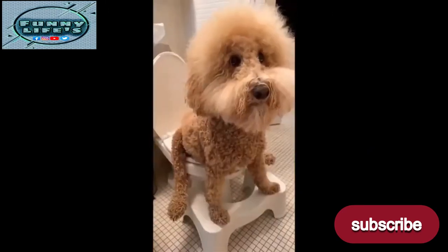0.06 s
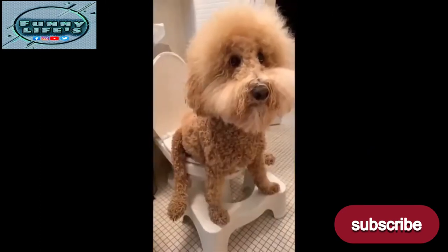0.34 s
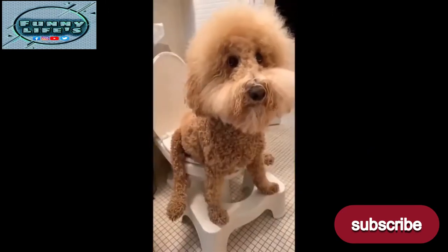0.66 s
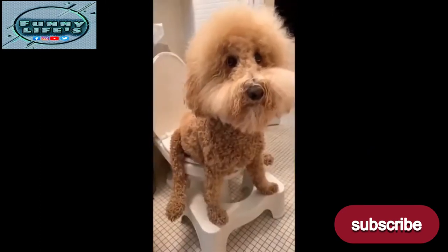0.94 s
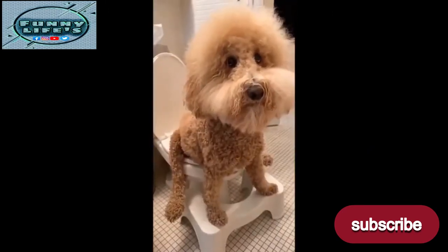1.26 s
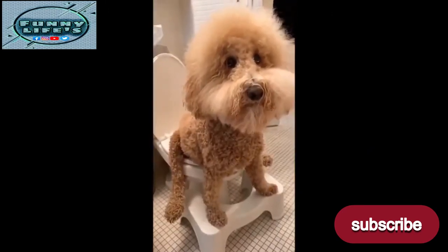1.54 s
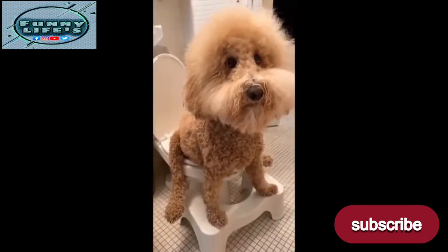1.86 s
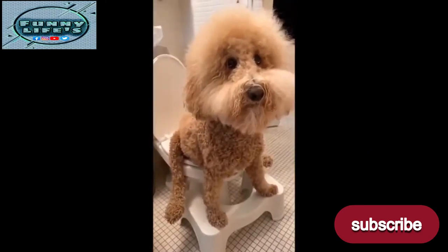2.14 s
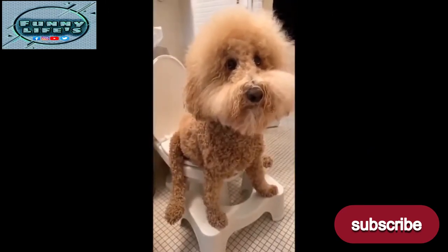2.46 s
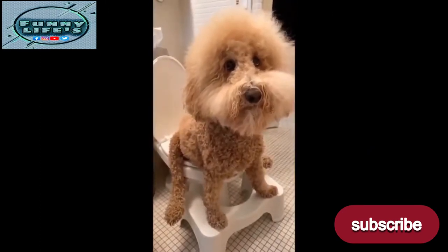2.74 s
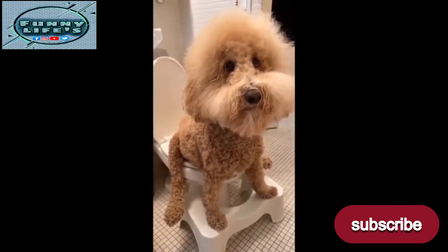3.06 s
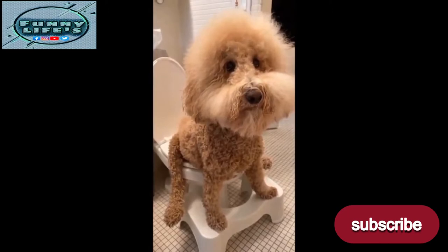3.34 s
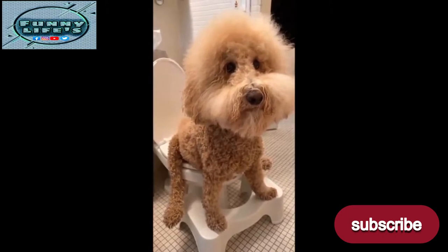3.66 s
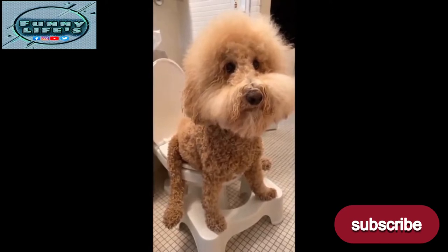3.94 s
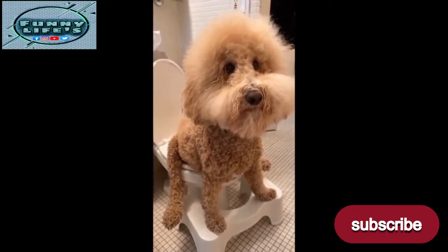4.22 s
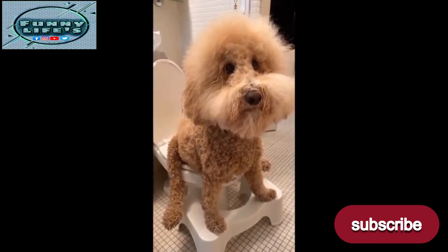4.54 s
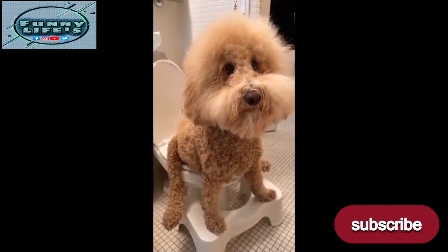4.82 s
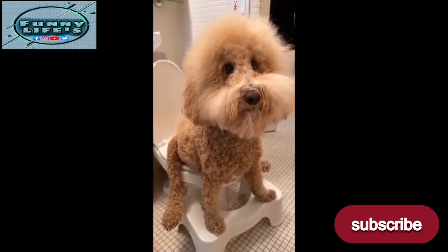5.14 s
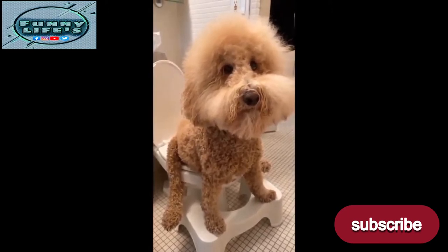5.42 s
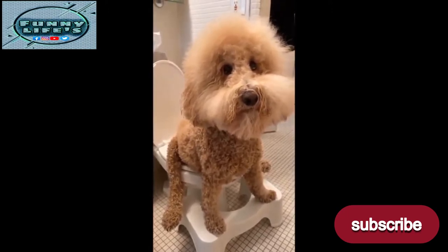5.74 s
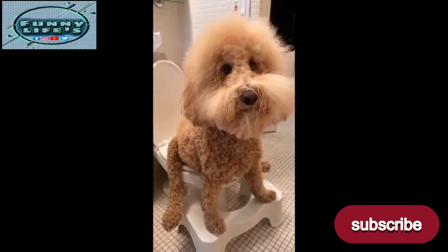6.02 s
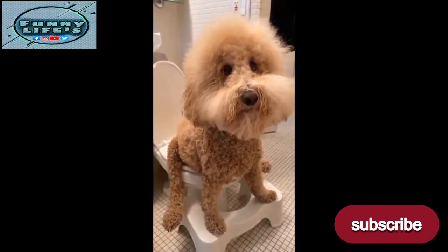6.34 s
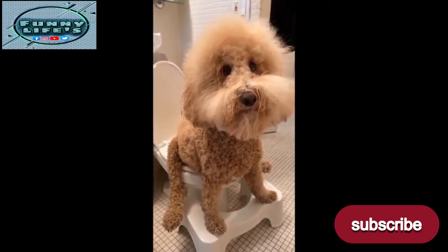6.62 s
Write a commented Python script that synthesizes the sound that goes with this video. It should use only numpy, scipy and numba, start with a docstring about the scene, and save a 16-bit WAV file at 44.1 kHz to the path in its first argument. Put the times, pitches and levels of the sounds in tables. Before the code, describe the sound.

In a small tiled bathroom, a ventilation fan hums quietly while a thin stream of liquid pours into a toilet nearby. It spatters and bubbles for around four seconds, with hollow glugs from the bowl, then breaks into drops. After a pause of about a second, it comes back in a brief splashing spurt, ending in soft fizzing and a few faint drips.

```python
"""A thin stream into a toilet bowl

The stream falls into the water for four seconds, dribbles out and returns in one short spurt. It splashes
and traps bubbles, each an oscillator whose pitch is lower the larger it is; the big ones gurgle in the
resonances of the bowl and a small tiled room. Foam fizzes after each pour, a few drips fall, and a
ventilation fan hums throughout."""
import sys
import numpy as np
from scipy import signal
from scipy.fft import rfft, irfft, next_fast_len
from scipy.io import wavfile
from scipy.ndimage import uniform_filter1d
from numba import njit

SR = 44100
rng = np.random.default_rng(int(sys.argv[2]) if len(sys.argv) > 2 else 0)


def wav_out(sig):
    """Save sig, one row per channel (or a flat mono array), as 16-bit PCM at SR to the path in sys.argv[1]."""
    wavfile.write(sys.argv[1], SR, np.round(np.clip(np.atleast_2d(sig).T, -1, 1) * 32767).astype(np.int16))


N = 299439
TIME = np.arange(N) / SR

# The two pours. Each row: times of first drops, full stream and break-up in seconds, spray level and
# opening surge in dB, sag and final fade in dB per second, starting cavity pitch in Hz, time before the
# froth thins and longest dribble in seconds.
POURS = [(0.177, 0.28, 4.195, -39.5, 6, 0.5, 133, 346.4, 0.43, 0.42),
         (5.297, 5.349, 6.02, -37, 2, 10, 268, 306.5, 0.36, 0.1)]
# Deep plunges that each trap one large bubble. Each row: start in seconds, relative peak level in dB,
# pitch in Hz, swell of the gurgle in dB.
PLUNGES = [(0.352, -18.5, 353, 4), (0.648, -17, 417, -0.5), (0.974, -22, 349, 3), (1.069, -20.5, 423, 4),
           (1.297, -22, 420, 3.5), (1.38, -24, 406, 3.5), (1.64, -28, 371, 5.5), (2.124, -19.5, 395, 4),
           (3.844, -22.5, 426, -0.5), (3.922, -21.5, 380, -1.5), (5.345, -17, 295.2, -0.5),
           (5.496, -22, 291, -0.5), (5.616, -14, 349, 4), (5.887, -19.5, 433, 4.5)]
# Drops that each trap one ringing bubble. Each row: start in seconds, relative peak in dB, pitch in Hz.
PLINKS = [(0.2139, -34.5, 3780), (0.2197, -41, 2640), (0.2303, -21.5, 7530), (0.33, -21.5, 6700),
          (0.358, -21.5, 3760), (0.41, -22, 3640), (0.5807, -25, 3630), (0.7933, -24, 3640),
          (0.9608, -25, 7290), (1.1067, -15, 7980), (1.29, -25.5, 8200), (1.555, -19, 7620),
          (1.758, -22, 7740), (1.841, -29, 4140), (2.2062, -23.5, 6600), (2.384, -24.5, 10700),
          (2.9395, -19, 9100), (3.082, -34, 803), (3.2784, -21.5, 8100), (3.4063, -24.5, 4080),
          (3.454, -31.5, 1590), (3.8735, -19, 9050), (4.3196, -46, 1110), (4.3625, -48.5, 1120),
          (4.495, -43, 594), (5.314, -25.5, 5470), (5.326, -27, 8800), (5.3935, -26, 4000),
          (5.4547, -27.5, 3120), (5.912, -34.5, 3730), (6.075, -29.5, 729), (6.233, -38, 7000)]
# Water landing with a smack. Each row: start in seconds, peak in dB, centre in Hz, width in octaves.
SMACKS = [(0.269, -27.5, 824, 0.52), (0.464, -27, 720, 0.2), (0.84, -20.5, 5670, 1.3),
          (0.974, -16.5, 6000, 1.3), (1.341, -26.5, 8600, 0.64), (1.677, -20, 7250, 1.2),
          (2.116, -33, 1000, 0.38), (2.331, -23.5, 817, 0.23), (2.510, -25, 5740, 1.4),
          (2.636, -23, 6000, 2.1), (3.244, -23.5, 9200, 0.7), (3.455, -19.5, 8500, 0.69),
          (3.984, -20.5, 8600, 3.6), (4.828, -45, 1230, 0.43), (4.839, -43.5, 1200, 0.7),
          (4.865, -50, 1480, 1.2), (4.887, -42, 10500, 0.22), (5.087, -42.5, 4200, 3),
          (5.281, -37, 7900, 3.8), (5.336, -25.5, 1500, 3.1), (5.345, -15, 5660, 1.38),
          (5.347, -24, 2040, 0.57), (5.512, -29, 6840, 0.57), (5.695, -13.5, 6150, 0.65),
          (6.464, -50, 7950, 1.4), (6.596, -48, 7000, 1), (6.727, -52, 8900, 0.38)]

OPENING_S, PLUNGE_S = 0.12, 0.033  # decay time of a pour's opening surge; swell time of a plunge


def gurgle(room, rate, spread_db, scatter, cycles, stray_db):
    """Minnaert resonance: large bubbles ring low, half near the cavity pitch, half weaker and astray."""
    start, place, deviate, size = random_grains(rate, spread_db)
    stray = np.arange(len(start)) % 2 == 0
    clustered_hz = np.interp(start, TIME, cavity_pitch()) * np.exp(scatter * deviate)
    hz = np.where(stray, 260 + 300 * place, clustered_hz)
    size = size * np.where(stray, undb(stray_db), 1)
    grains = bubbles(N, start, hz, np.full(len(hz), float(cycles)), size, glide=0.38)
    plunging_db = sum(db * swell(s - PLUNGE_S / 2, PLUNGE_S) for s, _, _, db in PLUNGES)
    return cloud(grains, stirring(column=1, surge_db=1) * undb(plunging_db - 1), room)


def cavity_pitch(shallow_hz=445.6, climb_s=0.82, dip=0.067):
    """Pitch follows depth: it climbs as the cavity dug by the stream gets shallower; plunges lower it."""
    hz = np.full(N, shallow_hz)
    for first, full, *_, deep_hz, _, _ in POURS:
        climbing_hz = shallow_hz + (deep_hz - shallow_hz) * np.exp(-since(full) / climb_s)
        hz = np.where(TIME >= first, climbing_hz, hz)
    plunging = np.max([swell(s, PLUNGE_S) for s, *_ in PLUNGES], axis=0)
    return hz * (1 - dip * plunging)


def stirring(column, surge_db, dig_s=0.031, settle_db_per_s=70):
    """Excitation and decay: a gain that surges as the stream digs its cavity and settles at break-up."""
    # Bubble activity round the cavity, one list per pour. Each row: time in seconds, then relative
    # levels of gurgle, churn and babble in dB.
    cavity = [
        [(0.5, -33.5, -47.5, -48), (0.75, -36, -47, -50.5), (1.16, -41.5, -51, -48), (1.84, -43, -47.5, -53.5),
         (2.27, -47, -46, -49), (2.73, -47.5, -48, -54.5), (3.01, -48.5, -43, -48.5), (3.95, -37.5, -53, -48),
         (4.09, -40.5, -46.5, -50), (4.2, -40.5, -48.5, -50)],
        [(5.5, -35, -53.5, -50.5), (5.828, -40, -49, -49), (6.05, -46.5, -51, -55)],
    ]
    gain = 0
    for (_, full, stop, *_), rows in zip(POURS, cavity):
        rows = np.array(rows)
        db = np.interp(TIME, rows[:, 0], rows[:, column]) + surge_db * np.exp(-since(full) / OPENING_S)
        gain += rise(full - dig_s, dig_s) * undb(db - settle_db_per_s * since(stop))
    return gain


def spray(room, ping_db, spatter_db=-17, spatter_s=0.0052):
    """Impact excitation: each bead throws a burst of crackle, small bubbles ping, sharp drops spatter."""
    # Spectrum of the spray. Each row: frequency in Hz, relative gain in dB.
    spray_colour = [(1180, -18.5), (2000, 7.5), (2210, -4.5), (2530, -8.5), (3490, 1), (4310, -0.5),
                    (5990, 1), (6580, -1.5), (7940, 1.5), (8650, -2), (9880, -1), (13000, -11)]
    patter = crackle(rate=12000, spread_db=7.5, cycles=7.8)
    patter *= beads(rate=125, spread_db=2.0, decay_s=0.0022, steady=0.089)
    pings = crackle(rate=800, spread_db=5.5, cycles=21.0)
    grains = level(patter, 0) + level(pings, ping_db)
    spatter = sum(undb(db + spatter_db) * swell(s, spatter_s)
                  for s, db, hz, *_ in PLINKS + SMACKS if hz > 3000)
    return cloud(colour(grains, spray_colour), np.hypot(flow(), spatter), room)


def flow():
    """Amplitude envelope of the stream: each pour opens with a surge, sags and fades at break-up."""
    gain = 0
    for first, full, stop, db, surge_db, sag, fade, *_ in POURS:
        opening_db = surge_db * np.exp(-since(full) / OPENING_S)
        gain += rise(first, full - first) * undb(db + opening_db - sag * since(full) - fade * since(stop))
    return gain


def crackle(rate, spread_db, cycles):
    """Resonance at small scale: tiny bubbles and droplets ring briefly, spread evenly over the treble."""
    start, place, deviate, size = random_grains(rate, spread_db)
    hz = 2200 + 11300 * place
    ring_cycles = cycles * np.exp(deviate / 2) + 1
    return bubbles(N, start, hz, ring_cycles, size * np.sqrt(hz / ring_cycles), glide=0.05)


def beads(rate, spread_db, decay_s, steady):
    """Shot noise as an envelope: abrupt random bursts decay and add in power over a steady floor."""
    start, _, _, size = random_grains(rate, spread_db)
    hits = np.bincount((start * SR).astype(int), (size / size.mean()) ** 2, N)[:N]
    power = signal.lfilter([1], [1, -np.exp(-2 / (decay_s * SR))], hits)
    return np.sqrt(steady ** 2 + power)


def drops(room, glug_db, glug_cycles, plink_db, plink_cycles, smack_s=0.0013):
    """Transients: trapped bubbles ring freely as glugs and plinks; impacts smack as bursts of noise."""
    out, t = np.zeros(N), TIME[:SR // 20]
    for s, db, hz, _ in PLUNGES:
        add(out, s, db + glug_db, lone_bubble(hz, glug_cycles, glide=0.091), room)
    for s, db, hz in PLINKS:
        add(out, s, db + plink_db, lone_bubble(hz, plink_cycles, glide=0.031), room)
    for s, db, hz, octaves in SMACKS:
        edges_hz = np.clip(hz * 2 ** (np.array([-1, 1]) * octaves / 2), 100, 0.45 * SR)
        band = signal.butter(2, edges_hz, "band", fs=SR, output="sos")
        noise = signal.sosfilt(band, rng.standard_normal(len(t)))
        add(out, s, db, noise * t * np.exp(-t / smack_s), room)
    return out


def churn(room, rate, spread_db, cycles):
    """Volume pulsation: middle-sized bubbles ring as they tumble in the water around the cavity."""
    start, place, deviate, size = random_grains(rate, spread_db)
    hz = 760 * np.exp(0.15 * deviate)
    grains = bubbles(N, start, hz, cycles * (0.5 + place), size, glide=0.28)
    return cloud(grains, stirring(column=2, surge_db=9) * undb(2), room)


def babble(room, rate, spread_db, cycles):
    """Pitch varies inversely with radius: small bubbles stirred in with the spray ring above the churn."""
    start, place, deviate, size = random_grains(rate, spread_db)
    hz = 1000 + 1550 * place
    grains = bubbles(N, start, hz, cycles * np.exp(0.3 * deviate), size * np.sqrt(hz), glide=0.026)
    return cloud(grains, stirring(column=3, surge_db=5.5) * undb(0.5), room)


def dribble(room, cycles, scatter, spread_db, hz=3670, db=-34, fade_db_per_s=42):
    """Jet break-up: each pour ends in a row of similar drops that ring ever more faintly."""
    lead_s, gap_s = 0.05, 0.031  # head start on the break-up; time between drops
    out = np.zeros(N)
    for _, _, stop, *_, dribble_s in POURS:
        for k, (late, sharp, loud) in enumerate(rng.standard_normal((12, 3))):
            age = (k + late / 8) * gap_s
            if age < dribble_s:
                ring = lone_bubble(hz * np.exp(scatter * sharp), cycles, glide=0.07)
                add(out, stop - lead_s + age, db - fade_db_per_s * age + spread_db * loud, ring, room)
    return out


def foam(room, db=-59.5, rise_s=0.13, fade_db_per_s=57):
    """Film rupture: the froth left by each pour bursts in fine ticks, lasts a moment and thins out."""
    # Spectrum of the fizz. Each row: frequency in Hz, relative gain in dB.
    foam_colour = [(1180, -51), (2000, -26), (3330, -4), (4280, -1.5), (6030, 0), (7170, 4), (13000, 0)]
    grains = crackle(rate=1700, spread_db=5.0, cycles=9.9)
    grains *= beads(rate=57, spread_db=10.0, decay_s=0.006, steady=0.31)
    froth = sum(rise(stop, rise_s) * undb(db - fade_db_per_s * since(stop + froth_s))
                for _, _, stop, *_, froth_s, _ in POURS)
    return cloud(colour(grains, foam_colour), froth, room)


def bathroom(early_db, early_t60_s, tail_db, t60_s, treble_t60_s, tail_hz):
    """Impulse response: direct sound, early reflections in the bowl, a tail off the tiles, and modes."""
    # Normal modes of bowl and room. Each row: frequency in Hz, bandwidth in Hz, gain in dB.
    modes = [(287.4, 4.65, 22.5), (353, 7.7, 14.5), (392.9, 13, 9.5), (436, 3.25, 13), (489.8, 4.6, 15),
             (562.4, 8.3, 12), (720, 4, 20), (777, 88, 8.5), (847, 28, 7.5), (1110, 11, 18),
             (1362, 13, 14.5), (1448.5, 17, 19.5), (1839, 24.6, 11.5), (2930, 5, 16), (3642, 42, -8)]
    t = TIME[:SR * 3 // 4]
    noise = highpass(rng.standard_normal(len(t)), tail_hz)
    treble = highpass(noise, 6000, order=1)
    early = noise * undb(-60 * t / early_t60_s) * (1 - np.exp(-t / 0.008))
    tail = (noise - treble) * undb(-60 * t / t60_s) + treble * undb(-60 * t / treble_t60_s)
    tail *= 1 - np.exp(-t / 0.0048)
    response = undb(early_db) * early / np.linalg.norm(early)
    response += undb(tail_db) * tail / np.linalg.norm(tail)
    for hz, width, db in modes:
        ring = np.exp(-np.pi * width * t) * np.sin(2 * np.pi * hz * t)
        response += undb(db) * 2 * np.pi * width / SR * ring
    response[0] += 1  # direct sound
    return highpass(response, hz=245, order=6)  # the bowl is too small to radiate bass


def fan():
    """Broadband and tonal noise: a ventilation fan gives soft rumble and air, with wavering hum lines."""
    # Spectrum of the moving air. Each row: frequency in Hz, relative gain in dB.
    fan_colour = [(13, -60), (22, -32), (48, -8), (69, -6), (91, -14.5), (125, -11), (264, -28), (301, -26),
                  (671, -31.5), (727, -31.5), (975, -34.5), (1340, -39.5), (2120, -41.5), (2550, -45.5),
                  (13000, -57)]
    # Duct, shaft and mains tones. Each row: frequency in Hz, rms level in dB.
    hum_lines = [(31.5, -68), (58.8, -57), (120, -56.5)]
    out = level(colour(rng.standard_normal(N), fan_colour), db=-52.5)
    for hz, db in hum_lines:
        tone = np.sin(2 * np.pi * hz * TIME + 0.085 * walk(rate=3.55))
        out += level(tone * undb(0.46 * walk(rate=7)), db)
    return out


@njit
def bubbles(length, start, hz, cycles, size, glide):
    """Damped oscillators: each swells as its bubble closes, then dies, rising in pitch near the surface."""
    out = np.zeros(length)
    for k in range(len(start)):
        life, first, phase = cycles[k] * SR / hz[k], int(start[k] * SR), 0.
        for i in range(min(int(life), length - first)):
            age = i / life
            phase += 2 * np.pi * min(hz[k] * (1 + glide * age), 0.45 * SR) / SR
            out[first + i] += size[k] * np.sin(phase) * np.exp(-8 * age) * (1 - np.exp(-9 * age)) ** 2
    return out


def lone_bubble(hz, cycles, glide):
    """Free oscillation of a single bubble."""
    return bubbles(SR // 5, np.zeros(1), np.full(1, float(hz)), np.full(1, float(cycles)),
                   np.ones(1), glide)


def random_grains(rate, spread_db):
    """Independent events: start times, a uniform place 0-1, a normal deviate and heavy-tailed sizes."""
    u = rng.random((int(rate * N / SR), 5))
    deviate = np.sqrt(-2 * np.log(1 - u[:, 2])) * np.cos(2 * np.pi * u[:, 3])
    rarity = -np.log(u[:, 4] + 0.01)
    return u[:, 0] * N / SR, u[:, 1], deviate, undb(spread_db * rarity)


def cloud(grains, gain, room):
    """Power normalisation: the rms level of the grains in the room follows the given gain."""
    power = uniform_filter1d(echo(grains, room) ** 2, size=3500)
    rms = np.sqrt(np.maximum(power, 0) + power.mean() / 1000)
    return echo(grains * gain / rms, room)


def echo(x, room):
    """Reverberation by convolution with the impulse response."""
    return signal.oaconvolve(x, room)[:N]


def add(out, s, db, sound, room):
    """Superposition: one short sound joins the mix, reverberated, at a given peak level."""
    first = int(s * SR)
    heard = signal.fftconvolve(sound, room)[:N - first]
    out[first:first + len(heard)] += undb(db) * heard / np.abs(heard).max()


def colour(x, points):
    """Spectral shaping by (Hz, dB) points, joined on a logarithmic frequency axis."""
    hz, db = np.transpose(points)
    size = next_fast_len(N)
    bins_hz = np.maximum(np.fft.rfftfreq(size, 1 / SR), 1)
    gain = undb(np.interp(np.log(bins_hz), np.log(hz), db))
    return irfft(rfft(x, size) * gain, size)[:N]


def highpass(x, hz, order=2):
    """Butterworth high-pass."""
    return signal.sosfilt(signal.butter(order, hz, "high", fs=SR, output="sos"), x)


def walk(rate):
    """Random modulation: ramps to a new value every 1 / rate seconds, with a spread near 1."""
    hold = max(int(SR / rate), 2)
    steps = np.repeat(rng.standard_normal(N // hold + 1), hold)
    return 1.2 * uniform_filter1d(steps, hold)[:N]


def since(s):
    """Seconds elapsed since a moment, 0 before it."""
    return np.maximum(TIME - s, 0)


def rise(s, length_s):
    """Quadratic onset from 0 to 1."""
    return np.minimum(since(s) / length_s, 1) ** 2


def swell(s, length_s):
    """Critically damped pulse that reaches 1 after its swell time."""
    age = since(s) / length_s
    return age * np.exp(1 - age)


def undb(db):
    """Decibels to amplitude gain."""
    return 10 ** (np.asarray(db) / 20)


def level(x, db):
    """Scaling to an rms level."""
    return x * undb(db) / np.sqrt(np.mean(x ** 2))


def scene():
    """Superposition of water and fan, alike in both channels; single drops sound drier than the stream."""
    room = bathroom(early_db=-1.5, early_t60_s=0.03, tail_db=-5.0, t60_s=0.53,
                    treble_t60_s=0.097, tail_hz=517)
    near = bathroom(early_db=-5, early_t60_s=0.021, tail_db=-4.5, t60_s=0.43,
                    treble_t60_s=0.11, tail_hz=517)
    water = gurgle(room, rate=480, spread_db=1.5, scatter=0.11, cycles=16.8, stray_db=-4.5)
    water += churn(room, rate=350, spread_db=5.5, cycles=20.1)
    water += babble(room, rate=600, spread_db=4.5, cycles=8.4)
    water += spray(room, ping_db=-2) + foam(room)
    water += dribble(room, cycles=19, scatter=0.072, spread_db=4.0)
    water += drops(near, glug_db=-5.5, glug_cycles=21.3, plink_db=1, plink_cycles=23)
    return np.tile(water + fan(), (2, 1))


def record(dry):
    """Band limiting: a steep elliptic low-pass cuts the treble above 13.1 kHz."""
    return signal.sosfilt(signal.ellip(10, 0.2, 75, 13100, fs=SR, output="sos"), dry)


dry = scene()
out = record(dry)
wav_out(out)
```